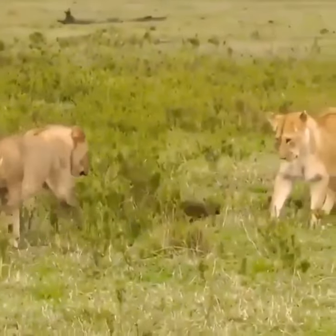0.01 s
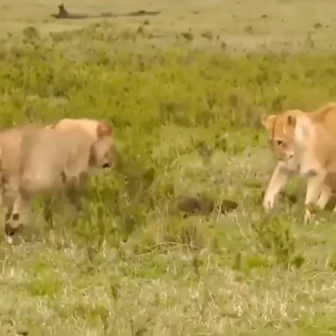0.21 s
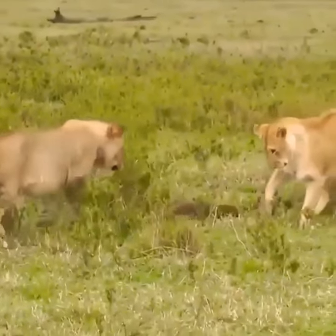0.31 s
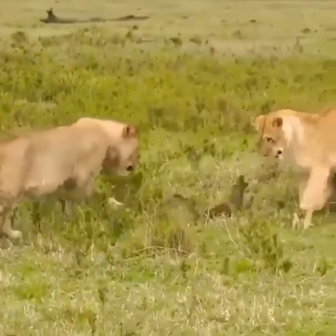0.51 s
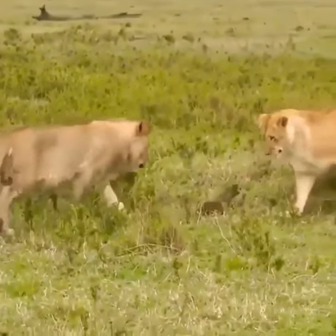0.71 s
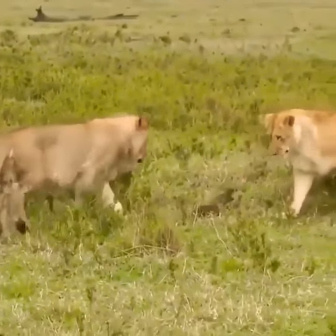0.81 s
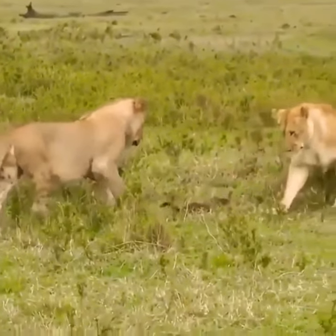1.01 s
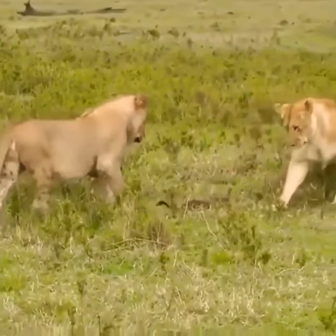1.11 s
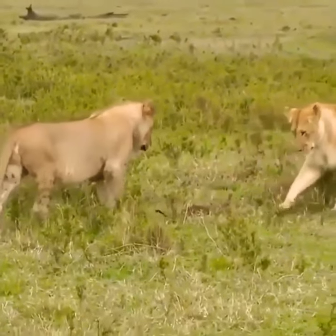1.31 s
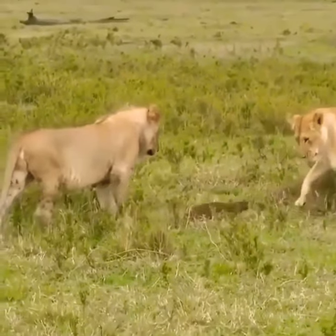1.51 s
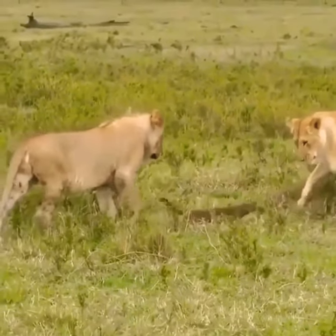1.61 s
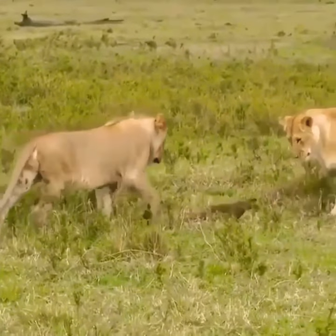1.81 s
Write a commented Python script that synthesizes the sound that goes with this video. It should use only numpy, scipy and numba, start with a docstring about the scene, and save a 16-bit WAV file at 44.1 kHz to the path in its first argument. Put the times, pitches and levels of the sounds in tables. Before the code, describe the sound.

A small mongoose at bay gives a short buzzing growl rising straight into a harsh, quavering screech, pauses, then spits once; close and dry outdoors, with faint air hiss, light wind bumps and grass rustles.

```python
"""Mongoose at bay

On open grassland a mongoose gives a buzzing growl that breaks into a harsh, quavering screech, then spits once.
The calls are vocal-fold pulses and turbulent air ringing throat resonances, plus a wavering whistle in the screech.
The spit is bursts of turbulence through mouth resonances. Dry grass rustles (crackling, filtered noise),
and light wind bumps the microphone (low bands of noise) over a faint outdoor hiss.
"""
import sys
import numpy as np
from scipy import signal
from scipy.fft import rfft, irfft
from scipy.io import wavfile
from scipy.ndimage import uniform_filter1d
from numba import njit

SR = 44100
rng = np.random.default_rng(int(sys.argv[2]) if len(sys.argv) > 2 else 0)


def transcribe(signal):
    """Save signal, clipped to [-1, 1], as a 16-bit WAV file at the path in sys.argv[1]."""
    frames = np.atleast_2d(signal).T
    limited = np.clip(frames, -1, 1)
    pcm = np.round(limited * 32767).astype(np.int16)
    wavfile.write(sys.argv[1], SR, pcm)


N = 81585  # samples


def undb(db):
    """Decibel law: amplitude gain is ten to the power dB / 20."""
    return 10 ** (np.asarray(db) / 20)


def unit(x):
    """Normalisation: scale a signal to an rms of 1."""
    return x / np.sqrt(np.mean(x ** 2))


def times():
    """Sampling: the time of every sample in seconds."""
    return np.arange(N) / SR


def curve(rows, axis=1):
    """Linear interpolation: one column of a table, joined by straight lines in time."""
    rows = np.array(rows, float)
    return np.interp(times(), rows[:, 0], rows[:, axis])


def noise():
    """White noise: equal mean power at all frequencies, rms 1."""
    return rng.standard_normal(N)


def walk(rate):
    """Smoothed randomness: two running means leave changes about rate times a second, rms 1."""
    size = max(int(SR / rate), 1)
    once = uniform_filter1d(noise(), size)
    return unit(uniform_filter1d(once, size))


def swell(centre, length):
    """Gaussian envelope: a bell that falls to half height length / 2 from its centre."""
    return .5 ** ((2 * (times() - centre) / length) ** 2)


def colour(x, points):
    """Spectral shaping: weight each frequency by (frequency [Hz], gain [dB]) points on a log axis."""
    hz, db = np.array(points, float).T
    bins_hz = np.maximum(np.fft.rfftfreq(N, 1 / SR), 1)
    gain_db = np.interp(np.log(bins_hz), np.log(hz), db)
    return irfft(rfft(x) * undb(gain_db), N)


def highpass(x, hz, order=4):
    """Butterworth high-pass: attenuate what lies under hz."""
    return signal.sosfilt(signal.butter(order, hz, 'high', fs=SR, output='sos'), x)


@njit
def bandpass(x, hz, width):
    """State-variable resonator: two coupled integrators form a band-pass whose centre may move."""
    out, band, low = np.empty(len(x)), 0., 0.
    for i in range(len(x)):
        g, damping = np.tan(np.pi * hz[i] / SR), width / hz[i]
        v = (band + g * (x[i] - low)) / (1 + g * (g + damping))
        # trapezoidal integration: low uses the new band value v
        band, low, out[i] = 2 * v - band, low + 2 * g * v, damping * v
    return out


def resonate(x, hz, width):
    """Cascaded resonance: the same band-pass twice gives steeper skirts."""
    hz = hz * np.ones(N)
    return bandpass(bandpass(x, hz, float(width)), hz, float(width))


# outdoor air spectrum, relative: (frequency [Hz], level per hertz [dB])
AIR_SPECTRUM = [(15, -17), (30, -4), (50, -1), (90, -7.5), (135, -20), (250, -15), (370, -16.5), (470, -27),
                (580, -24.5), (750, -18.5), (1000, -45), (1350, -54), (1900, -27.5), (2700, -23),
                (5000, -33.5), (8000, -41.5), (13000, -48)]
AIR_DB = -46


def outdoor_air():
    """Broadband ambience: noise of fixed spectrum, its level wavering about six times a second."""
    return unit(colour(noise(), AIR_SPECTRUM)) * undb(AIR_DB + 2.1 * walk(5.9))


# low rush of air, strongest while the animal calls: (time [s], level [dB])
RUSH_LEVEL_CURVE = [(0, -51.5), (.3, -50), (.46, -45.5), (.7, -46.5), (.88, -48), (.96, -53.5)]
RUSH_HZ, RUSH_WIDTH_HZ = 572, 1240


def air_rush():
    """Band-limited turbulence: noise through one broad, low resonance."""
    return unit(resonate(noise(), RUSH_HZ, RUSH_WIDTH_HZ)) * undb(curve(RUSH_LEVEL_CURVE))


# rustles in the dry grass: (centre [s], length [s], level [dB])
GRASS_RUSTLES = [(1.011, 0.034, -55), (1.242, 0.021, -46), (1.39, 0.033, -52), (1.686, .07, -54),
                 (1.76, 0.077, -46), (1.84, 0.047, -48.5)]
# relative spectrum of the grass: (frequency [Hz], gain [dB])
GRASS_SPECTRUM = [(410, -51), (700, -28), (883, -16), (1550, -33), (1710, -13), (2380, -6.5), (3650, -11.5),
                  (4490, -13.5), (5660, -22.5), (13000, -31.5)]
GRASS_CRACKLE_DB = -1.5


def grass_rustles():
    """Modulated noise: fast random level changes crackle inside each bell-shaped rustle."""
    crackling = noise() * undb(GRASS_CRACKLE_DB * walk(900))
    grass = unit(colour(crackling, GRASS_SPECTRUM))
    return grass * sum(undb(db) * swell(s, length) for s, length, db in GRASS_RUSTLES)


# wind bumps on the microphone: (centre [s], length [s], centre frequency [Hz], level [dB])
WIND_BUMPS = [(0.094, 0.08, 81, -43.5), (0.162, 0.015, 64, -33.5), (0.196, 0.022, 123, -33.5),
              (0.245, 0.071, 120, -38), (0.313, 0.14, 75.7, -37), (0.384, 0.072, 66, -39.5),
              (0.43, 0.015, 114, -33.5), (0.481, 0.026, 213, -31), (0.489, 0.11, 60, -39.5),
              (0.562, 0.059, 194, -40.5), (0.756, 0.22, 210, -50.5)]


def wind_bumps():
    """Flow noise: wind on the microphone makes short bumps of low noise, wider in band when higher."""
    wind = 0
    for s, length, hz, db in WIND_BUMPS:
        band = unit(resonate(noise(), hz, 0.74 * hz))
        wind = wind + undb(db) * swell(s, length) * band
    return wind


def background():
    """Superposition: outdoor air, low rush, grass rustles and wind bumps add together."""
    return outdoor_air() + air_rush() + grass_rustles() + wind_bumps()


def mouth(resonances, crackle):
    """Parallel resonances: crackling turbulence rings each resonance of the mouth."""
    return unit(sum(undb(db) * resonate(noise() * crackle, hz, width) for hz, width, db in resonances))


# bursts of the spit: (onset [s], level before attack and decay [dB], amplitude decay constant [s],
# power share of sharp hiss [0-1]; the rest is open-mouthed rasp)
SPIT_BURSTS = [(1.483, -24, 0.0069, 0.7), (1.4915, -14.5, 0.0077, 0.76), (1.503, -21.5, 0.023, 0.98),
               (1.53, -27, 0.041, 0), (1.544, -25.5, 0.049, 0.04), (1.575, -20.5, 0.03, 0.13),
               (1.604, -22, 0.023, 0.04)]
# mouth resonances of the sharp hiss: (frequency [Hz], width [Hz], relative level [dB])
SHARP_MOUTH = [(572, 92, -7), (1750, 890, -7), (3130, 2300, -1), (4130, 210, -1), (4980, 370, 5),
               (5540, 1100, -2.5), (6850, 2400, -2.5), (9100, 1800, -10.5), (11100, 5000, -12)]
# mouth resonances of the rasp: (frequency [Hz], width [Hz], relative level [dB])
RASP_MOUTH = [(612, 160, -1.5), (804, 140, -3), (1230, 680, -6), (1800, 320, 1.5), (2330, 460, 5),
              (2940, 550, 0), (3520, 530, 4.5), (4260, 650, 2), (5630, 1230, 0), (8600, 6400, -12.5),
              (12100, 3400, -19)]
SPIT_ATTACK_S, SPIT_SHUT_S, SPIT_RELEASE_S, SPIT_CRACKLE_DB = 0.0012, 1.611, 0.0023, 0.5


def spit():
    """Jet turbulence: bursts of air, first sharp through the teeth, then rasping, end as the mouth shuts."""
    t, crackle = times(), undb(SPIT_CRACKLE_DB * walk(1500))
    sharp, rasp = mouth(SHARP_MOUTH, crackle), mouth(RASP_MOUTH, crackle)
    sharp_power = rasp_power = 0
    for s, db, decay, share in SPIT_BURSTS:
        age = np.maximum(t - s, 0)
        envelope = undb(db) * (1 - np.exp(-age / SPIT_ATTACK_S)) * np.exp(-age / decay)
        sharp_power = sharp_power + share * envelope ** 2
        rasp_power = rasp_power + (1 - share) * envelope ** 2
    shut = np.exp(-np.maximum(t - SPIT_SHUT_S, 0) / SPIT_RELEASE_S)
    return (sharp * np.sqrt(sharp_power) + rasp * np.sqrt(rasp_power)) * shut


PUFF_CYCLES = 0.89  # decay constant of each puff, in cycles


def folds(hz, jitter, rough, doubling, shimmer_db):
    """Vocal-fold source: a click and a decaying puff each cycle; doubling weakens every other cycle."""
    cycles = np.cumsum(hz * (1 + jitter * walk(250))) / SR
    phase = cycles % 1
    clicks = np.sinc((phase - np.round(phase)) * SR / hz)  # band-limited
    puffs = noise() * np.exp(-phase / PUFF_CYCLES)
    size = (1 + doubling * np.cos(np.pi * cycles)) * undb(shimmer_db * walk(314))
    return size * (np.sqrt(1 - rough ** 2) * unit(clicks) + rough * unit(puffs))


def smear(x, spread_s):
    """Dispersion: scatter by the grass delays neighbouring frequencies by slightly different times."""
    delay = spread_s * unit(uniform_filter1d(rng.standard_normal(N // 2 + 1), size=700))
    phase = 2 * np.pi * np.cumsum(delay) * SR / N  # delay is the slope of phase over frequency
    return irfft(rfft(x) * np.exp(-1j * phase), N)


VOICE_LOW_HZ = 1076  # both calls are cut below this
HISS_FROM_HZ = 4600  # throat resonances above this are driven by steady hiss, wholly or partly

# growl pitch: (time [s], pulse rate [Hz])
GROWL_PULSES = [(0.225, 152.2), (0.239, 155), (0.281, 169.1), (0.313, 178.1), (0.335, 178.9),
                (0.365, 176.2), (0.401, 180.1), (0.429, 189.9), (0.49, 191.7)]
# growl loudness: (time [s], level [dB])
GROWL_LEVEL_CURVE = [(.208, -53), (.216, -32), (.235, -22.5), (.27, -22), (.34, -22.5), (.39, -24),
                     (.43, -21), (.48, -21.5), (.54, -49), (.57, -80)]
# throat resonances: (frequency [Hz], width [Hz], relative level [dB])
GROWL_RESONANCES = [(1330, 330, -12), (1810, 210, 1), (2380, 260, 2.5), (2850, 200, -10), (3660, 340, -1),
                    (4080, 220, -5), (4430, 160, -9), (4930, 380, -13), (6050, 500, -19), (7400, 1200, -31),
                    (9800, 2500, -39)]
# jaw opening: (time [s], factor on the upper resonances [ratio], added level of the third resonance [dB])
GROWL_JAW_CURVE = [(.22, .935, -16), (.255, .975, -11), (.295, 1.015, 0), (.33, 1.025, 1), (.39, .975, 0),
                   (.45, .9, 0)]
# turbulence in the pulses: (time [s], roughness [0-1])
GROWL_ROUGHNESS = [(.21, .7), (.25, .38), (.3, .18), (.36, .18), (.41, .42)]
GROWL_JITTER, GROWL_SMEAR_S = .005, .0018
TREBLE_VOICED, GROWL_HISS = .55, .8  # gains of pulses and hiss in the treble
UPPER_FROM_HZ = 2200  # resonances above this follow the jaw


def growl():
    """Source-filter principle: nearly regular, rising pulses ring a tiny throat; treble is mostly hiss."""
    pulses = folds(curve(GROWL_PULSES), GROWL_JITTER, curve(GROWL_ROUGHNESS), doubling=0, shimmer_db=0.0)
    source = smear(pulses, GROWL_SMEAR_S)
    jaw, out = curve(GROWL_JAW_CURVE), 0
    for k, (hz, width, db) in enumerate(GROWL_RESONANCES):
        opening_db = curve(GROWL_JAW_CURVE, axis=2) if k == 2 else 0
        drive = TREBLE_VOICED * source + GROWL_HISS * noise() if hz > HISS_FROM_HZ else source
        centre = hz * (jaw if hz > UPPER_FROM_HZ else 1)
        out = out + undb(db + opening_db) * resonate(drive, centre, width)
    return unit(highpass(out, VOICE_LOW_HZ, order=8)) * undb(curve(GROWL_LEVEL_CURVE))


# quavers of the shrill tone: (centre [s], length [s], pitch [Hz], peak level [dB])
TONE_QUAVERS = [(.443, 0.037, 2030, -21.5), (.470, 0.053, 2095, -15), (.493, 0.023, 2003, -14),
                (.515, 0.0078, 1922, -14), (.532, 0.022, 1973, -25), (.556, .018, 1985, -18),
                (.580, 0.027, 1945, -14.5), (.607, 0.027, 1880, -20.5), (.641, 0.048, 1980, -20.5),
                (.668, 0.023, 1920, -13.5), (.689, 0.028, 1944, -17), (.714, 0.024, 1910, -19.5),
                (.735, 0.011, 1967, -11.5), (.756, 0.04, 1920, -20), (.786, 0.073, 1900, -18.5),
                (.828, 0.03, 1880, -19.5), (.85, 0.023, 1810, -18), (.878, 0.045, 1750, -26)]
TONE_WOBBLE, TONE_FLUTTER_DB = 0.0189, 3.3  # rms pitch deviation [ratio], rms level deviation [dB]


def shrill_tone():
    """Frequency and amplitude modulation: a second, whistling oscillation quavers on the screech."""
    hz = curve(TONE_QUAVERS, axis=2) * (1 + TONE_WOBBLE * walk(365))
    phase = 2 * np.pi * np.cumsum(hz) / SR
    size = np.sqrt(sum((undb(db) * swell(s, length)) ** 2 for s, length, _, db in TONE_QUAVERS))
    return size * undb(TONE_FLUTTER_DB * walk(393)) * np.sin(phase)


# screech loudness: (time [s], level [dB])
SCREECH_LEVEL_CURVE = [(.37, -55), (.405, -28), (.445, -17.5), (.5, -19), (.58, -18), (.68, -20.5),
                       (.77, -21), (.845, -22.5), (.897, -25.5), (.906, -30), (.93, -53.5)]
# jaw movement, mostly closing: (time [s], factor on the resonances before weighting [ratio])
SCREECH_JAW_CURVE = [(.4, 0.98), (.455, 1.151), (.52, 1.04), (.62, 0.985), (.73, 0.934), (.82, 0.76),
                     (.9, 0.67)]
# throat resonances: (frequency [Hz], width [Hz], relative level [dB], exponent on the jaw factor [-])
SCREECH_RESONANCES = [(1345, 120, -7, 0.089), (1955, 350, 5, 0.6), (2416, 264, 7, 0.7),
                      (2927, 430, 8, 0.92), (3215, 470, 2, 0.73), (3736, 220, -5.5, 1.12),
                      (5160, 1060, -16, 0.27), (9300, 2100, -35.5, 0)]
SCREECH_PULSE_HZ, SCREECH_JITTER, SCREECH_ROUGH = 190.5, .015, .55
SCREECH_DOUBLING, SCREECH_SHIMMER_DB = .4, 1.5


def screech():
    """Period doubling: folds beat strong and weak in turn under hiss; resonances sink as the jaw closes."""
    pulses = folds(np.full(N, SCREECH_PULSE_HZ), SCREECH_JITTER, SCREECH_ROUGH,
                   SCREECH_DOUBLING, SCREECH_SHIMMER_DB)
    source, jaw = smear(pulses, spread_s=0.00495), curve(SCREECH_JAW_CURVE)
    out = 0
    for hz, width, db, share in SCREECH_RESONANCES:
        drive = noise() if hz > HISS_FROM_HZ else source
        out = out + undb(db) * resonate(drive, hz * jaw ** share, width)
    return unit(highpass(out, VOICE_LOW_HZ, order=8)) * undb(curve(SCREECH_LEVEL_CURVE))


FIELD_T60_S = 0.12


def field(x):
    """Diffuse reverberation: a short decaying noise tail of open ground, different in each channel."""
    t = times()[:N // 4]
    tails = rng.standard_normal((2, len(t))) * np.exp(-np.log(1000) * t / FIELD_T60_S)
    return np.array([signal.fftconvolve(x, tail / np.linalg.norm(tail))[:N] for tail in tails])


def stereo(mid, side):
    """Mid-side principle: left is their sum, right their difference."""
    return np.array([mid + side, mid - side])


# width of the background: (frequency [Hz], side level minus mid level [dB])
BACKGROUND_WIDTH = [(40, -16), (130, -2), (300, -6), (700, -7.5), (2000, -37.5), (5000, -6.5), (12000, -1)]
FIELD_DB, SPIT_FIELD_DB, SPIT_SIDE_DB = -24.5, -14, -6
CALL_CEILING = 1.2


def scene():
    """Superposition in space: the animal is straight ahead; spit treble and background spread wider."""
    voice = growl() + screech() + shrill_tone()
    call = CALL_CEILING * np.tanh(voice / CALL_CEILING)  # the loudest peaks round off
    burst = spit()
    # independent noise in the side signals makes the width
    burst_side = undb(SPIT_SIDE_DB) * highpass(spit(), hz=3280, order=2)
    animal = call + stereo(burst, burst_side)
    tail = field(undb(FIELD_DB) * call + undb(SPIT_FIELD_DB) * burst)
    return animal + tail + stereo(background(), colour(background(), BACKGROUND_WIDTH))


TOP_HZ = 13100


def record(dry):
    """Band limitation: a steep elliptic low-pass removes the top of the treble."""
    return signal.sosfilt(signal.ellip(10, .1, 90, TOP_HZ, fs=SR, output='sos'), dry)


dry = scene()
out = record(dry)
transcribe(out)
```